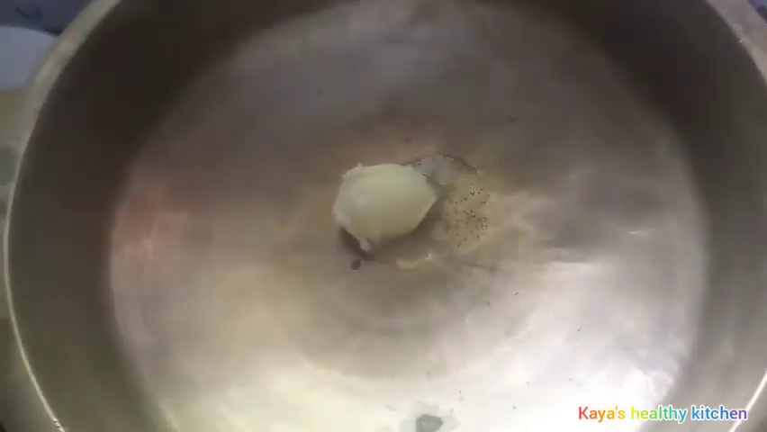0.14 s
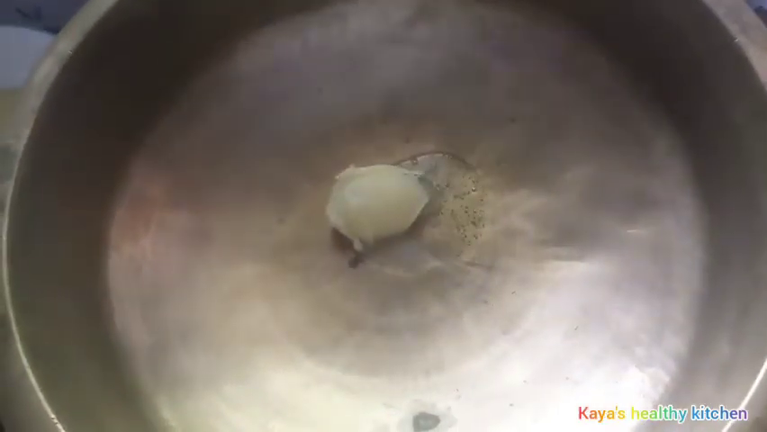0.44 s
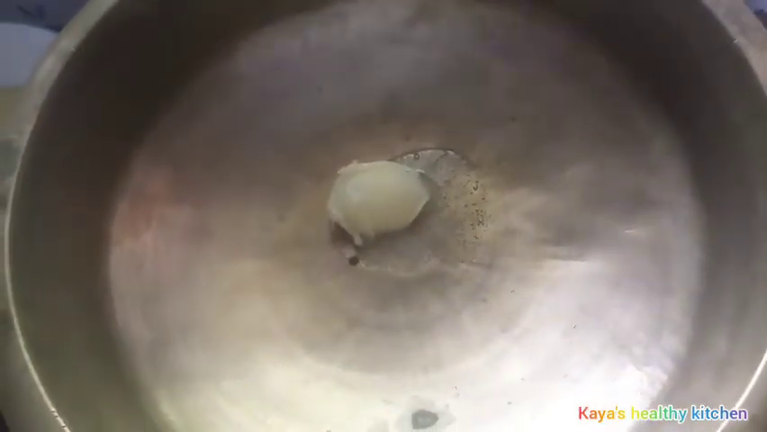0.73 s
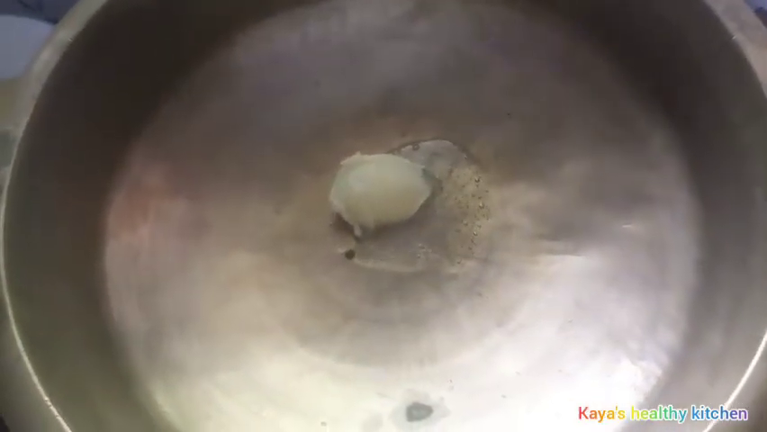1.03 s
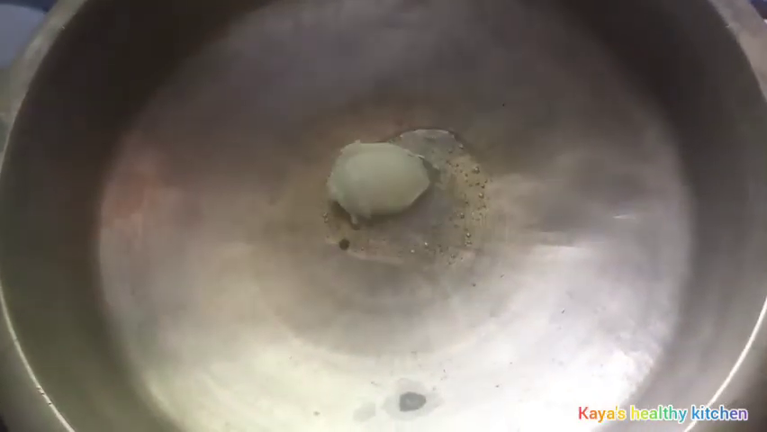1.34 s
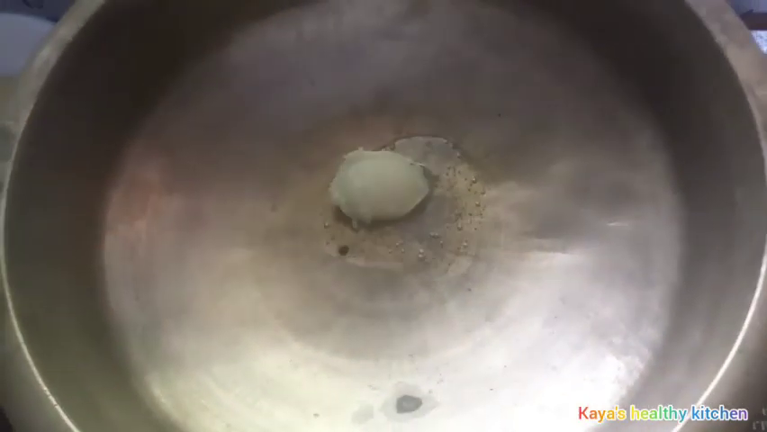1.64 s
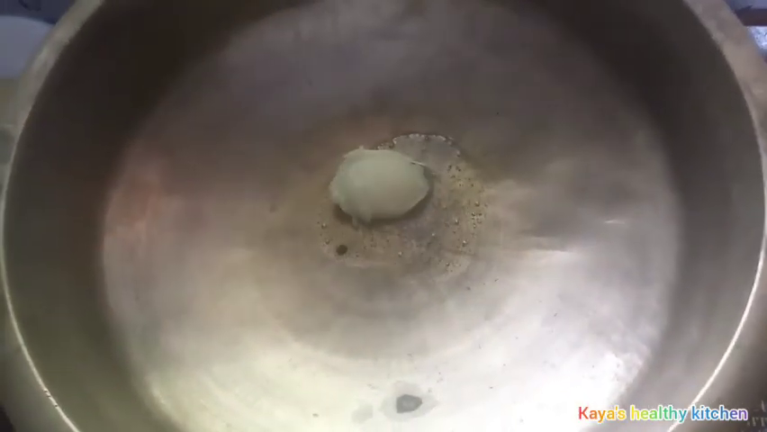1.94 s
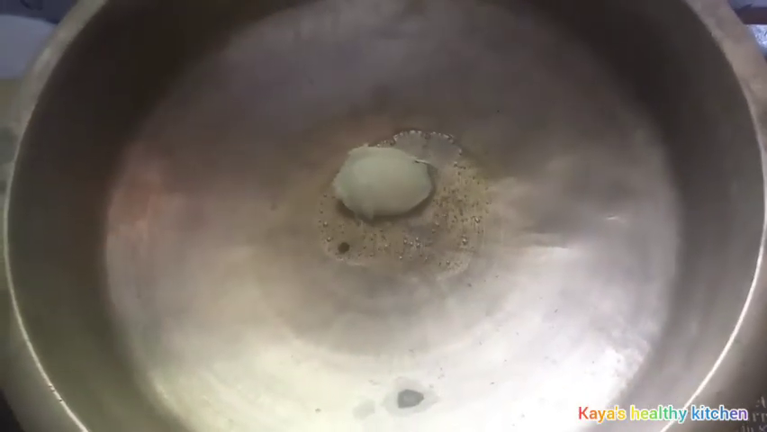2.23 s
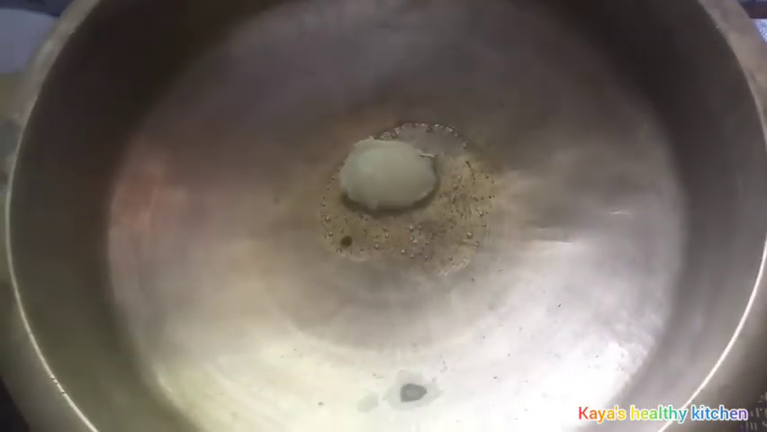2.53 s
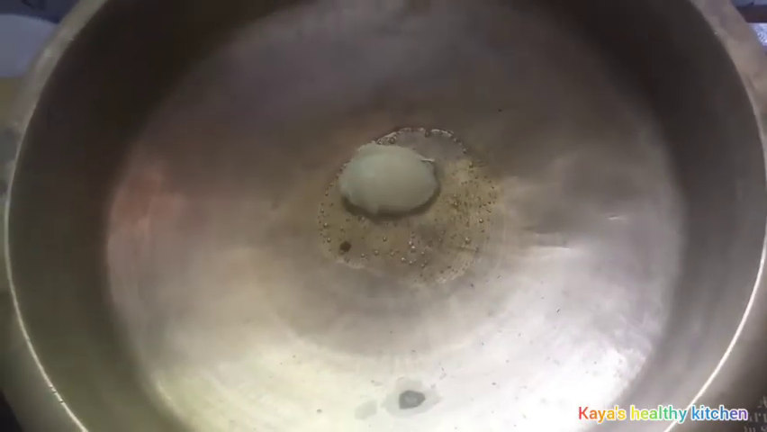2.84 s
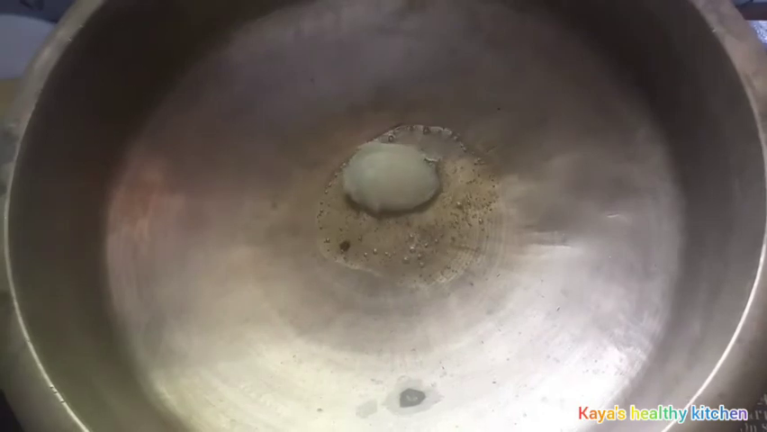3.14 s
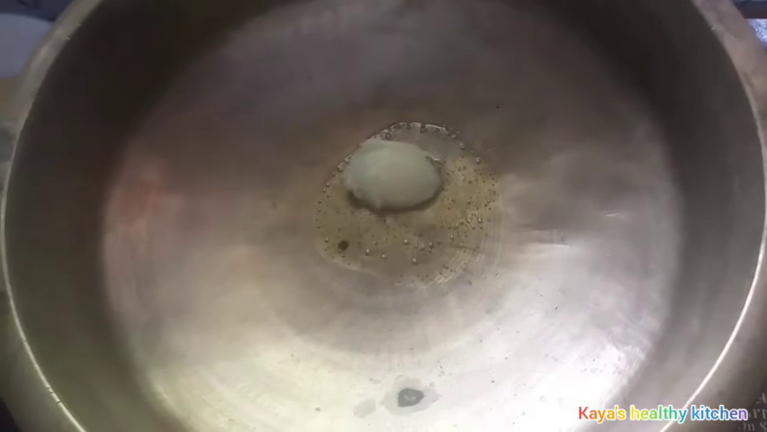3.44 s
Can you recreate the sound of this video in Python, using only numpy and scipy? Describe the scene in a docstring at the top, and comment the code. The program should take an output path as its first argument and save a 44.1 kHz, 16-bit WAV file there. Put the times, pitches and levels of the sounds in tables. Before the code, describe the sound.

Sizzling ghee in a metal pan starts strong, crackles with hard snapping pops midway, then drops quickly to sparse tiny pops over a quiet room; close, mono, with a short metallic kitchen reverberation.

```python
"""Ghee melting in a hot pan

A lump of ghee melts in a hot steel pan; its water boils off as a dense sizzle that thins out into single pops.
Sizzle bubbles are short pitched rings with sparse cracks; each pop pairs a bubble ring with a crack.
The pan wall echoes the cracks, the pan rings and the kitchen answers; tiny droplets spit in the top treble.
A quiet room floor of shaped noise and a faint swelling tone lie below, all heard in mono."""
import sys
import numpy as np
from scipy import signal
from scipy.fft import rfft, irfft
from scipy.io import wavfile
from scipy.ndimage import uniform_filter1d, minimum_filter1d

SR = 44100
rng = np.random.default_rng(int(sys.argv[2]) if len(sys.argv) > 2 else 0)


def store_pcm(level_fs):
    """Save levels as 16-bit WAV."""
    pcm = np.round(np.clip(level_fs, -1, 1) * 32767).astype(np.int16)
    wavfile.write(sys.argv[1], SR, np.atleast_2d(pcm).T)


def nominal_scale(level):
    """Amplitude ratio for a level in decibels (scalar or array-like)."""
    x = np.asarray(level, float) / 20
    return 10 ** x


N = 158760

# sizzle: bubble rates before clumping, large ones at a level of -16 dB, fine ones at their highest level
LARGE_PER_S, FINE_PER_S = 700, 4700
RATE_FOLLOWS_LARGE, RATE_FOLLOWS_FINE = 0.72, 0.88   # share of the level's swing
LARGE_SPREAD_DB, FINE_SPREAD_DB, CLUMP_DB = 4.5, 2, 2.5
LOWEST_HZ, SPLIT_HZ, HIGHEST_HZ = 2084, 5094, 12500   # large bubbles below the split, fine above
BUBBLE_CYCLES = 11.5   # cycles in the 60 dB decay of each of a bubble's two resonators
LARGE_TILT_DB_PER_S = 2   # per octave: the higher large bubbles gain on the lower ones
FLICKER_DB, CLUMP_HZ = 2.34, 13
CRACKS_PER_S, CRACK_SPREAD_DB, CRACK_DB = 120, 3.5, -11   # level re large bubbles, when those are at -17.5 dB
# pops and cracks
POP_CYCLES, POP_RISE_S, POP_DIRECT_DB = 16.0, .0013, -5
CRACK_HZ, CRACK_S = 3800, .00015
WALL_ECHO_S, WALL_ECHO_DB = 0.001652, -12
THUMP_HZ, THUMP_DB, THUMP_T60_S = 629, -41, 0.031
# pan and kitchen: decay times below and above 6500 Hz, and of the pan's modes
KITCHEN_DB, KITCHEN_T60_S, TREBLE_T60_S = -0.5, 0.23, 0.34
TAIL_FROM_HZ, PAN_T60_S = 1680, .6
# background and limiter
FLOOR_DB, HUM_HZ, HUM_T60_S = -55.5, 780, 0.32
LIMIT_DB, RELEASE_DB_PER_S = -1, 1200


def sizzle():
    """Large bubbles carry the middle range, a fine fizz the treble; four spots around the lump boil apart."""
    # Vigour of the boil. Each row: time in seconds, level of large bubbles in dB, level of fine bubbles in dB.
    boil = [(0, -23, -23.5), (.12, -13, -22), (.5, -16, -20), (.75, -14.5, -22), (1.1, -17, -23.5),
            (1.55, -21.5, -25.5), (1.83, -29.5, -29), (1.95, -35, -31), (2.2, -40.5, -38), (2.45, -41, -39),
            (2.6, -88, -42), (3.08, -49.5, -43), (3.2, -94, -53), (3.6, -51, -46)]
    # Colour of pan and microphone. Each row: frequency in Hz, gain in dB.
    colour = [(120, -31.5), (300, -42), (607, -14), (1040, -17.5), (1400, -9), (1650, -20), (1980, -11.5),
              (3200, -10), (4230, 0), (4970, -12), (8500, -11.5), (9800, -26), (11300, -23), (13000, -32),
              (14300, -20), (15700, -17.5)]
    large_db, fine_db = in_time(boil)
    large_per_s = LARGE_PER_S * nominal_scale(RATE_FOLLOWS_LARGE * (large_db + 16))
    fine_per_s = FINE_PER_S * nominal_scale(RATE_FOLLOWS_FINE * (fine_db - fine_db.max()))
    tilt_db = LARGE_TILT_DB_PER_S * np.arange(N) / SR
    large = fine = 0
    for spot in range(4):
        # dividing by the root of the rate leaves the level to the boil table
        rings = bursts(large_per_s / 4, LARGE_SPREAD_DB, LOWEST_HZ, SPLIT_HZ, count=8, tilt_db=tilt_db)
        rings = rings / np.sqrt(large_per_s / large_per_s.mean())
        large = large + rings + pan_and_kitchen(rings)
        rings = bursts(fine_per_s / 4, FINE_SPREAD_DB, SPLIT_HZ, HIGHEST_HZ, count=8)
        rings = rings / np.sqrt(fine_per_s / fine_per_s.mean())
        flicker = nominal_scale(FLICKER_DB * drift(CLUMP_HZ))
        fine = fine + flicker * (rings + pan_and_kitchen(rings))
    cracks = rms_one(cracked(clicking(CRACKS_PER_S, CRACK_SPREAD_DB)))
    # cracks stand out more as the large bubbles fade
    crack_gain = nominal_scale(CRACK_DB - 0.19 * (large_db + 17.5))
    large = rms_one(coloured(large, colour)) + crack_gain * cracks
    return nominal_scale(large_db) * large + nominal_scale(fine_db) * rms_one(coloured(fine, colour))


def bursts(per_s, spread_db, low_hz, high_hz, count, tilt_db=0):
    """Random bubbles in clumps, each click ringing two equal resonators in a row at one of several pitches."""
    clicks = clicking(per_s * nominal_scale(CLUMP_DB * drift(CLUMP_HZ)), spread_db)
    dealt = rng.integers(0, count, N)
    total = 0
    for k, hz in enumerate(np.geomspace(low_hz, high_hz, count)):
        t60 = BUBBLE_CYCLES / hz
        bubbles = ring(ring(clicks * (dealt == k), hz, t60), hz, t60)
        tilt = nominal_scale(tilt_db * np.log2(hz / low_hz))
        total = total + (hz / high_hz) ** 2 * tilt * bubbles
    return rms_one(total)


def pops():
    """Each pop: a crack and a bubble that swells and rings down, at one of four spots in the pan."""
    # Each row: start in seconds, crack level in dB, bubble pitch in Hz,
    # bubble level re crack in dB (before the high-pass and the direct gain).
    single_pops = [(1.0126, -19.5, 4500, 4), (1.1566, -13.5, 4000, 9), (1.2975, 2.5, 3970, -6),
                   (1.3262, -17, 4120, -5), (1.3815, 2, 4030, -17), (1.5225, -3.5, 3650, -3),
                   (1.6198, -5.5, 3900, -1), (1.6946, 2.5, 3730, -32), (1.7622, -6.5, 4770, 2),
                   (1.7851, 4, 3880, -11.5), (1.9178, -2, 3980, -22), (2.0116, -6.5, 4100, -3.5),
                   (2.1225, -12, 4950, 1), (2.2387, -20, 6300, 6.5), (2.2816, -19, 4800, -1),
                   (2.3137, -25.5, 7800, 9.5), (2.3511, -17, 5360, 1), (2.405, -25, 5130, 5),
                   (2.4805, -39.5, 2190, 13.5), (2.52, -15.5, 3750, -30), (2.545, -18, 4700, -19),
                   (2.563, -28, 7740, 5), (2.5879, -28, 8240, 7), (2.6473, -16, 4880, -2.5),
                   (2.7215, -20, 5930, -2.5), (2.7528, -24, 8300, 1), (2.782, -18, 6070, -3),
                   (2.8264, -22.5, 6050, 3), (2.8527, -15.5, 5000, -3.5), (2.8772, -25.5, 7850, 10),
                   (2.9528, -32, 6400, 5), (2.9882, -22, 7700, 1.5), (3.0201, -29.5, 8400, 6.5),
                   (3.062, -23, 7060, 1), (3.203, -28.5, 5780, 6.5), (3.3369, -10.5, 5200, -2),
                   (3.3704, -16.5, 7470, -8), (3.525, -16, 4800, -7), (3.5818, -31, 8200, 8.5)]
    bubbles, cracks = np.zeros((4, N + 400)), np.zeros(N)
    click = 1. * (np.arange(400) == int(POP_RISE_S * SR))
    for k, (s, db, hz, bubble_db) in enumerate(single_pops):
        start = int(s * SR)
        t60 = POP_CYCLES / hz
        bubble = ring(ring(click, hz, t60), hz, t60)
        bubbles[k % 4, start:][:400] += nominal_scale(db + bubble_db) * bubble / bubble.max()
        cracks[start] = nominal_scale(db) * (-1) ** k
    bubbles = signal.sosfilt(signal.butter(2, 1200, "high", fs=SR, output="sos"), bubbles)
    total = cracked(cracks)
    for spot in bubbles[:, :N]:
        # the bubble sounds mostly by way of the pan and the walls
        total = total + nominal_scale(POP_DIRECT_DB) * spot + pan_and_kitchen(spot)
    return total


def cracked(clicks):
    """Each click becomes a brief crack, direct and off the pan wall; the pan bottom answers with a thump."""
    t = np.arange(200) / SR - POP_RISE_S

    def crack(t):
        return np.cos(2 * np.pi * CRACK_HZ * t - 1) * np.exp(-.5 * (t / CRACK_S) ** 2)

    with_echo = crack(t) + nominal_scale(WALL_ECHO_DB) * crack(t - WALL_ECHO_S)
    cracks = signal.fftconvolve(clicks, with_echo)[:N]
    cracks = signal.sosfilt(signal.butter(2, 1500, "high", fs=SR, output="sos"), cracks)
    thumps = nominal_scale(THUMP_DB) * ring(clicks, THUMP_HZ, THUMP_T60_S)
    return cracks + nominal_scale(-6) * pan_and_kitchen(cracks) + thumps


def clicking(per_s, spread_db):
    """Random clicks of either sign, few of them large."""
    sizes = nominal_scale(spread_db * np.minimum(rng.exponential(1, N), 3)) * rng.choice([-1, 1], N)
    return sizes * (rng.random(N) < per_s / SR)


def spits():
    """Tiny droplets spit: single clicks, band-passed into bright ticks in the top treble."""
    # Each row: start in seconds, level in dB before the lift and the band-pass.
    droplets = [(2.3518, -34), (2.522, -23), (2.7165, -30), (3.2394, -24), (3.3186, -35), (3.3705, -28),
                (3.482, -29)]
    clicks = np.zeros(N)
    for s, db in droplets:
        clicks[int((s + POP_RISE_S) * SR)] = nominal_scale(db + 12)
    ticks = signal.sosfilt(signal.butter(2, [9500, 14000], "band", fs=SR, output="sos"), clicks)
    return ticks + nominal_scale(-11) * pan_and_kitchen(ticks)


def pan_and_kitchen(x):
    """A diffuse tail of echoes in the pan and the kitchen, and the pan's modes; drawn anew at every call."""
    # Modes of the pan. Each row: frequency in Hz, level in dB before a random factor.
    pan_modes = [(4800, -52), (5090, -54), (8430, -53)]
    t = np.arange(SR // 2) / SR
    low, high = rng.standard_normal((2, len(t)))
    low = signal.sosfilt(signal.butter(2, 6500, "low", fs=SR, output="sos"), low)
    high = signal.sosfilt(signal.butter(2, 6500, "high", fs=SR, output="sos"), high)
    tail = low * nominal_scale(-60 * t / KITCHEN_T60_S) + high * nominal_scale(-60 * t / TREBLE_T60_S)
    tail = signal.lfilter(*signal.butter(1, TAIL_FROM_HZ, "high", fs=SR), tail)
    tail *= np.clip(t / WALL_ECHO_S, 0, 1) ** 2   # echoes build up until the wall echo
    tail /= np.sqrt(np.sum(tail ** 2))
    modes = sum(nominal_scale(db) * rng.standard_normal() * ring(t == 0, hz, PAN_T60_S) for hz, db in pan_modes)
    return signal.fftconvolve(x, nominal_scale(KITCHEN_DB) * tail + modes)[:N]


def room_floor():
    """Gently wavering kitchen noise, and a faint tone made by noise through a narrow resonator."""
    # Spectrum of the floor. Each row: frequency in Hz, gain in dB.
    floor_colour = [(25, -20), (60, 3.5), (130, 1.5), (300, -16), (1100, -17), (1500, 1), (2050, -3),
                    (2420, 10), (2900, -17), (9500, -2), (15500, -70)]
    # The tone swells and fades. Each row: time in seconds, level in dB.
    tone_level = [(2.55, -95), (2.72, -71), (2.8, -98), (3.06, -65), (3.16, -85)]
    tone = rms_one(ring(rng.standard_normal(N), HUM_HZ, HUM_T60_S))
    noise = rms_one(coloured(rng.standard_normal(N), floor_colour))
    return nominal_scale(FLOOR_DB + 0.5 * drift(5.8)) * noise + nominal_scale(in_time(tone_level)[0]) * tone


def rms_one(x):
    """Scales to rms 1."""
    return x / np.sqrt(np.mean(x ** 2) + 1e-20)


def in_time(rows):
    """Columns of a curve, one value per sample."""
    s, *columns = np.transpose(rows)
    return [np.interp(np.arange(N) / SR, s, c) for c in columns]


def gain_at(points, hz):
    """Gain of a spectrum table at given frequencies, in straight lines over log frequency."""
    table_hz, table_db = np.transpose(points)
    return nominal_scale(np.interp(np.log(hz + 1), np.log(table_hz), table_db))


def coloured(x, points):
    """Causal (minimum-phase) filter that follows a spectrum table."""
    cepstrum = irfft(np.log(gain_at(points, np.linspace(0, SR / 2, 2049))))
    # folding the cepstrum onto positive time makes the phase minimal
    cepstrum[1:2048] *= 2
    cepstrum[2049:] = 0
    return signal.fftconvolve(x, irfft(np.exp(rfft(cepstrum))))[:N]


def ring(clicks, hz, t60):
    """Two-pole resonator: a unit click sets a decaying sine of starting height 1 ringing."""
    r, w = nominal_scale(-60 / (t60 * SR)), 2 * np.pi * hz / SR
    return signal.lfilter([0, np.sin(w)], [1, -2 * r * np.cos(w), r * r], clicks + 1e-18)


def drift(hz):
    """Slow random wander of rms 1: noise through two equal one-pole low-passes."""
    r = np.exp(-2 * np.pi * hz / SR)
    wander = signal.lfilter([1], [1, -2 * r, r * r], rng.standard_normal(N + SR))
    return rms_one(wander[SR:])   # the first second lets the filter settle


def scene():
    """One microphone feeds both channels."""
    return np.tile(sizzle() + pops() + spits() + room_floor(), (2, 1))


def band_limit(x):
    """A steep low-pass at the top of the band."""
    return signal.sosfilt(signal.butter(12, 15700, fs=SR, output="sos"), x)


def record(dry):
    """A look-ahead limiter holds the peaks and lets go at a steady rate in dB."""
    fall = RELEASE_DB_PER_S * np.arange(N) / SR
    over = np.maximum(20 * np.log10(np.abs(dry[0]) + 1e-9) - LIMIT_DB, 0)
    released = np.maximum.accumulate(over + fall) - fall
    held = -minimum_filter1d(-released, size=177)   # reaches 2 ms ahead
    mix = dry * nominal_scale(-uniform_filter1d(held, size=89))
    return band_limit(mix)


dry = scene()
out = record(dry)
store_pcm(out)
```